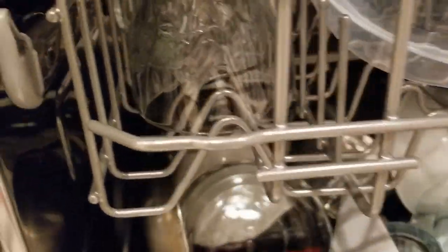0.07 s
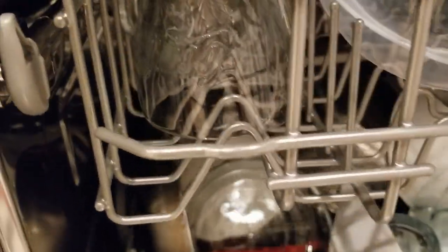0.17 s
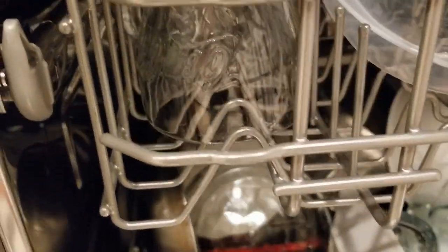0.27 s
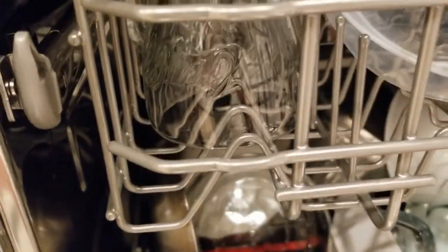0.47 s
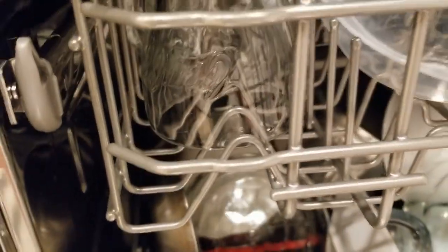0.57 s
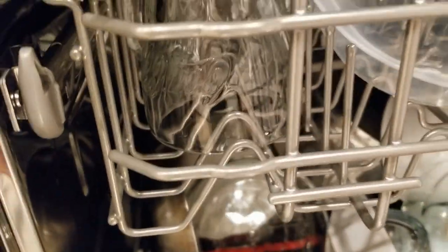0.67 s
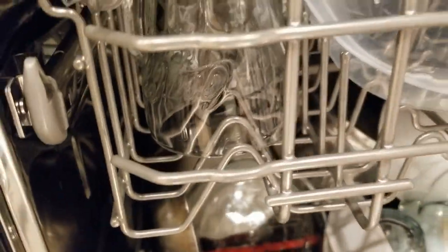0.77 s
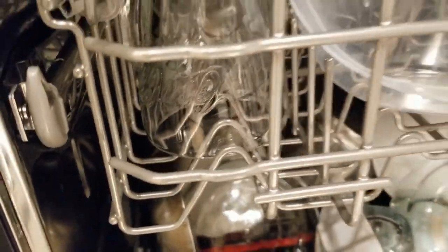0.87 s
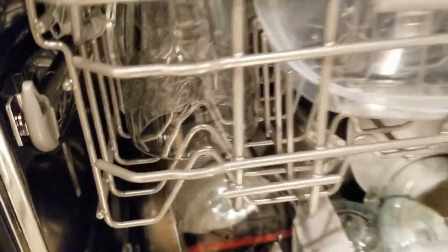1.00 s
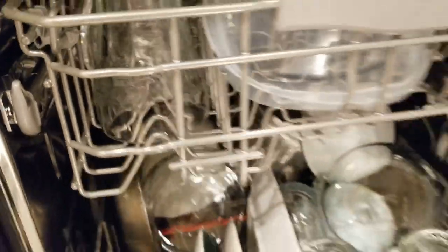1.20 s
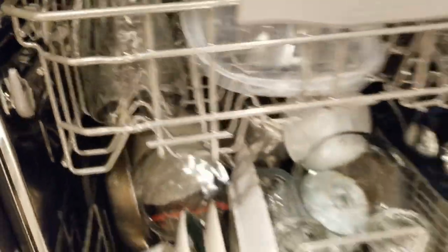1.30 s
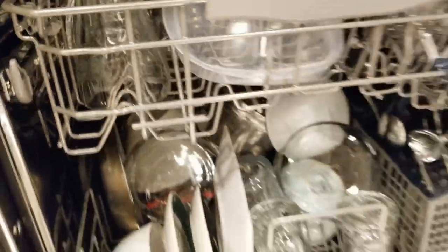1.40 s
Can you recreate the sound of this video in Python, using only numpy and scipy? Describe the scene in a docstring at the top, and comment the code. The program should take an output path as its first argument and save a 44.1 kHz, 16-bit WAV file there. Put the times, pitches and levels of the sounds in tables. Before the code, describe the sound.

Dishes clatter once, close up, as a sliding wire dishwasher rack hits its stop with a dull boom. The ringing dies quickly, leaving one small tick, a faint shimmer of wires and the hush of a kitchen.

```python
"""In a quiet kitchen, a loaded wire dishwasher rack rumbles and rubs along its runners, clinking lightly.
At about 0.25 s it jolts against a stop: glasses and crockery knock together in one quick cluster
and ring, the steel tub booms underneath, thin wires jingle and the room echoes faintly.
After about 0.56 s the ring is cut short and fades quickly. At 0.7 s comes one tiny sharp tick,
then a soft shimmer of wires and a few faint taps over the hush of the room."""
import sys
import numpy as np
from scipy import signal
from scipy.fft import rfft, irfft
from scipy.io import wavfile

SR = 44100
rng = np.random.default_rng(int(sys.argv[2]) if len(sys.argv) > 2 else 0)


def put_to_file(sound):
    """Save the sound as 16-bit audio at rate SR, in the file named by the first command-line argument."""
    columns = np.atleast_2d(sound).T  # one column per channel
    safe = np.clip(columns, -1, 1)
    whole_steps = np.round(safe * 32767)
    wavfile.write(sys.argv[1], SR, whole_steps.astype(np.int16))


N = 63945
T = np.arange(N) / SR
HZ = np.maximum(np.arange(N + 1) * SR / (2 * N), 1)  # the frequencies of a spectrum


def undb(db):
    """Turn decibels into a gain to multiply by."""
    return 10 ** (np.asarray(db) / 20)


def unit(x):
    """Scale to an average strength (rms) of 1."""
    return x / np.sqrt(np.mean(x ** 2))


def lookup(points, hz):
    """Read between the rows of a table, giving each octave equal room."""
    freqs, values = np.array(points, float).T
    return np.interp(np.log(hz), np.log(freqs), values)


def tone(points):
    """Turn a table of frequencies and decibels into a gain at every frequency."""
    return undb(lookup(points, HZ))


def shape(x, gain):
    """Filter by a gain at each frequency, so that nothing sounds before its cause."""
    cepstrum = irfft(np.log(gain + 1e-7))
    cepstrum[1:N] *= 2
    cepstrum[N + 1:] = 0
    return irfft(rfft(x, 2 * N) * np.exp(rfft(cepstrum)))[:N]


def noise(gain):
    """Noise of strength 1, coloured by a gain at each frequency."""
    return unit(irfft(rfft(rng.standard_normal(2 * N)) * gain)[:N])


def fall(start, t60):
    """Jump to 1 at the start, then fade by 60 dB every t60 seconds (the fade time)."""
    return (T >= start) * undb(-60 * np.maximum(T - start, 0) / t60)


def soften(hz, bright_hz):
    """A gain that drops above bright_hz, as a softer contact gives less treble."""
    return 1 / np.sqrt(1 + (hz / bright_hz) ** 4)


def spike(start):
    """A single hard contact, one sample long."""
    return 1. * (np.arange(N) == round(start * SR))


def ripple(depth_db=3.5, step_hz=90, from_hz=6000):
    """Many small wire resonances put random peaks in the treble."""
    grid = np.arange(0, SR / 2, step_hz)
    peaks = np.interp(HZ, grid, rng.standard_normal(len(grid)))
    return undb(depth_db * peaks * (1 - soften(HZ, from_hz)))


# tone of the quiet room: f/Hz, relative level/dB
KITCHEN_TONE = [(20, -7.5), (40, -6.5), (65, -4.5), (95, 3), (150, -8), (220, -8.5), (330, -10.5),
                (600, -14), (1000, -18), (2000, -26), (4000, -31.5), (5500, -31.5), (6600, -27.5),
                (8000, -35), (15500, -41.5)]
def kitchen():
    """The room gives a steady, low hush."""
    return undb(-69.5) * noise(tone(KITCHEN_TONE))


# knocks of the load: t/s, relative level/dB, brightness/Hz
KNOCKS = [(-.03, -27, 6000), (0.2354, -24, 3060), (0.2421, -14.5, 2600), (0.2448, -10.5, 1700),
          (.2628, -11, 12000), (0.2642, -6.5, 10090), (0.2685, -5.5, 7496), (0.277, -2.5, 4400),
          (0.2811, -2.5, 4000), (.287, -11, 3400), (.294, -13.5, 3080), (0.305, -22, 11000),
          (.311, -3.5, 560), (0.347, -24.5, 13900), (0.36, -13, 7000), (0.418, -27, 2900)]
# tone of the crowd of weak resonances in rack and tub: f/Hz, relative level/dB
CROWD_TONE = [(100, -14), (200, -10.5), (360, -9.5), (600, -2), (1100, -2), (1550, -6.5), (2100, -5),
              (2600, -7), (3200, -7), (3550, -12.5), (4300, -14), (5000, -13.5), (5800, -12.5), (6450, -18),
              (7100, -15), (7850, -23.5), (8600, -14.5), (10500, -22.5), (14000, -27.5), (16000, -38.5)]
# how long that crowd rings: f/Hz, fade time/s
CROWD_FADE = [(150, .45), (600, .34), (1500, .38), (4000, 0.32), (8000, 0.3), (14000, .28)]
def clatter(ring_db=-25.5, clack_db=-17, contact_db=-14.5):
    """Each knock is a click of contact, a short clack and a dense ring that fades band by band."""
    centres = np.geomspace(CROWD_FADE[0][0], CROWD_FADE[-1][0], num=8)
    bands = [np.interp(np.log(HZ), np.log(centres), row) for row in np.eye(len(centres))]
    colour = unit(tone(CROWD_TONE)) * ripple()
    out = 0
    for start, db, bright_hz in KNOCKS:
        crowd = rfft(rng.standard_normal(2 * N))
        ring = sum(irfft(crowd * band)[:N] * fall(start, lookup(CROWD_FADE, hz))
                   for hz, band in zip(centres, bands))
        clack = rng.standard_normal(N) * fall(start, t60=.081)
        hit = undb(ring_db) * ring + undb(clack_db) * clack + undb(contact_db) * spike(start)
        out += undb(db) * shape(hit, colour * soften(HZ, bright_hz))
    return out


# notes of the glasses and crockery: f/Hz, relative level/dB, fade time/s, waver speed/Hz
DISH_NOTES = [(516, 1, .24, 8), (555, -4, .2, 8), (622, 0, .2, 12), (751, -5, .22, 10), (914, 2, .22, 14),
              (1044, -8, .36, 15), (1078, -9, .3, 15), (1313, -9, .36, 25), (1735, -8, .3, 20),
              (1885, -1, .26, 35), (2003, -2, .28, 20), (2293, -11, .36, 40), (2868, -1, .4, 45),
              (3020, -7, .3, 50), (3280, -6, .27, 45)]
# high notes of the rack's wires: f/Hz, relative level/dB, fade time/s, waver speed/Hz
WIRE_NOTES = [(3778, -7, .38, 25), (3925, -10, .36, 50), (4004, -9, .38, 30), (4618, -9, .3, 40),
              (4974, -13, .3, 45), (5437, -12, .32, 55), (5855, -6, .3, 55), (6050, -10, .3, 70),
              (6775, -11, .26, 50), (7482, -3, .18, 45), (8260, -5, .2, 55)]
def ringing(notes, rise_s=.003, cut_s=.56):
    """Every knock feeds each note, which fades fast, then slowly; close neighbours make it waver."""
    lag = np.exp(-1 / (rise_s * SR))
    # contact damps part of each ring at once
    damped = [undb(-4) * fall(start, t60=.045) for start, _, _ in KNOCKS]
    out = 0
    for hz, db, t60, waver_hz in notes:
        energy = sum((undb(knock_db) * soften(hz, bright_hz) * (fall(start, t60) + quick)) ** 2
                     for (start, knock_db, bright_hz), quick in zip(KNOCKS, damped))
        swing = np.sqrt(signal.lfilter([1 - lag], [1, -lag], energy))
        waver = 1 + .4 * noise(soften(HZ, waver_hz))
        wander = .8 * noise(soften(HZ, waver_hz))
        phase = 2 * np.pi * (hz * T + rng.random()) + wander
        out += undb(db) * swing * waver * np.sin(phase)
    cut_short = (T < cut_s) + fall(cut_s, t60=.16)  # the ring fades quickly after cut_s
    return undb(-28.5) * cut_short * out


# loudness of the rumble: t/s, level/dB
RUMBLE_LEVEL = [(0, -47), (.1, -43), (.21, -46.5), (.26, -30), (.33, -43), (.45, -45), (.58, -57),
                (.64, -71.5), (.71, -71), (.82, -75.5), (.95, -80), (1.45, -75)]
# tone of the rumble: f/Hz, relative level/dB
RUMBLE_TONE = [(15, -10), (40, 0), (75, -2), (125, -9), (180, -19), (300, -35.5), (600, -62)]
def rack_rumble():
    """The moving rack makes a low rumble, loudest at the jolt."""
    times, levels = np.array(RUMBLE_LEVEL).T
    return noise(tone(RUMBLE_TONE)) * undb(np.interp(T, times, levels))


# rubs on the runners: t/s, level/dB, half length/s, brightness/Hz
RUBS = [(.008, -55, 0.036, 4500), (0.054, -49.5, .005, 4511), (0.07, -37.5, .006, 2433),
        (0.101, -51.5, 0.011, 1200), (.17, -58.5, .03, 698.4)]
# resonances of the runners: f/Hz, width/Hz, relative level/dB
RUNNER_PEAKS = [(380, 200, -22), (540, 40, -9), (624, 60, -4), (760, 90, -8), (915, 70, -3),
                (1170, 180, -2), (1345, 100, 2), (1820, 260, -9), (3190, 200, -8), (5400, 1800, -25)]
def runners():
    """Short bursts of rubbing make the runners resonate, then die away in the tub."""
    power = sum(undb(db) ** 2 / (1 + ((HZ - hz ** 2 / HZ) / width) ** 2) ** 2.1
                for hz, width, db in RUNNER_PEAKS)
    colour = unit(np.sqrt(power))
    out = 0
    for at, db, half_s, bright_hz in RUBS:
        push = np.exp(-.5 * ((T - at) / half_s) ** 2)
        echo = undb(-4) * fall(at, t60=.3)
        friction = rng.standard_normal(N) * np.hypot(push, echo)
        out += undb(db) * shape(friction, colour * soften(HZ, bright_hz))
    return out


# thuds of the tub and door: t/s, level/dB, f/Hz, rise time/s, fade time/s
THUDS = [(.2445, -10, 92, .005, .05), (.2695, -21, 118, .003, .07), (.2665, -23, 66, .004, .12),
         (.343, -30, 84, .004, .33), (.698, -60, 89, .003, .55)]
def tub_thuds():
    """The panels boom with low notes that die quickly."""
    out = 0
    for start, db, hz, rise, t60 in THUDS:
        age = np.maximum(T - start, 0)
        swell = 1 - np.exp(-age / rise)
        out += undb(db) * swell * fall(start, t60) * np.sin(2 * np.pi * hz * age)
    return out


# tone of the kitchen's echo: f/Hz, relative level/dB
ECHO_TONE = [(60, -10), (170, 2.5), (400, -4), (900, -2), (2500, -7.5), (4500, -15), (8000, -26),
             (15000, -41)]
def room_echo():
    """The jolt lingers in the kitchen as a faint wash of noise."""
    return undb(-48.5) * noise(tone(ECHO_TONE)) * fall(start=.25, t60=1.05)


# brushes of wire on wire: t/s, level/dB, f/Hz, width/Hz, rise time/s, fade time/s
JINGLES = [(0.297, -46, 12030, 4505, .004, 0.18), (.348, -55, 12500, 4000, .003, 0.089),
           (0.426, -57.5, 8350, 805, 0.0019, 0.25), (.89, -75, 9500, 6070, 0.0092, .3),
           (.945, -75, 8000, 4000, .015, 0.44)]
def jingles():
    """Thin wires touch and shimmer briefly in the treble."""
    out = 0
    for start, db, hz, width, rise, t60 in JINGLES:
        shimmer = noise(soften(HZ - hz, width / 2) * ripple())
        swell = 1 - np.exp(-np.maximum(T - start, 0) / rise)
        out += undb(db) * shimmer * swell * fall(start, t60)
    return out


# tone of the tick: f/Hz, relative level/dB
TICK_TONE = [(1000, -36), (5000, -28), (7000, -15), (8600, -1), (11000, 0), (13000, -5), (16000, -13)]
def tick(start=.6977):
    """One tiny hard contact gives a bright tick with a faint echo."""
    echo = undb(-36) * rng.standard_normal(N) * fall(start, t60=.2)
    return undb(-25) * shape(spike(start) + echo, tone(TICK_TONE))


# faint taps of the rack: t/s, level/dB
TAPS = [(1.026, -89), (1.124, -77), (1.253, -72), (1.284, -75.5), (1.318, -66), (1.363, -66), (1.385, -68),
        (1.402, -80), (1.421, -64)]
# tone of a tap: f/Hz, relative level/dB
TAP_TONE = [(200, 3), (700, -8), (1100, 8), (1900, -6.5), (2700, -4.5), (3500, -42), (10000, -51)]
def taps():
    """The rack taps lightly: each tap is a dull puff of noise with a faint echo."""
    out = 0
    for start, db in TAPS:
        echo = undb(-16) * fall(start, t60=.3)
        out += undb(db) * noise(tone(TAP_TONE)) * (fall(start, t60=.02) + echo)
    return out


def scene():
    """Add the rack, its load and the kitchen into one channel."""
    load = clatter() + ringing(DISH_NOTES) + ringing(WIRE_NOTES)
    rack = jingles() + rack_rumble() + runners() + tub_thuds() + tick() + taps()
    return (load + rack + kitchen() + room_echo())[None]


def record(dry, top_hz=15700):
    """The microphone cuts the highest treble."""
    return signal.sosfilt(signal.ellip(8, .2, 70, top_hz, fs=SR, output="sos"), dry)


dry = scene()
out = record(dry)
put_to_file(out)
```